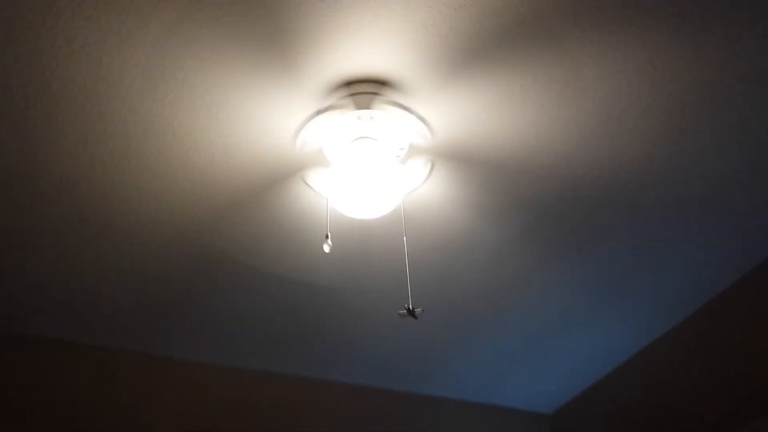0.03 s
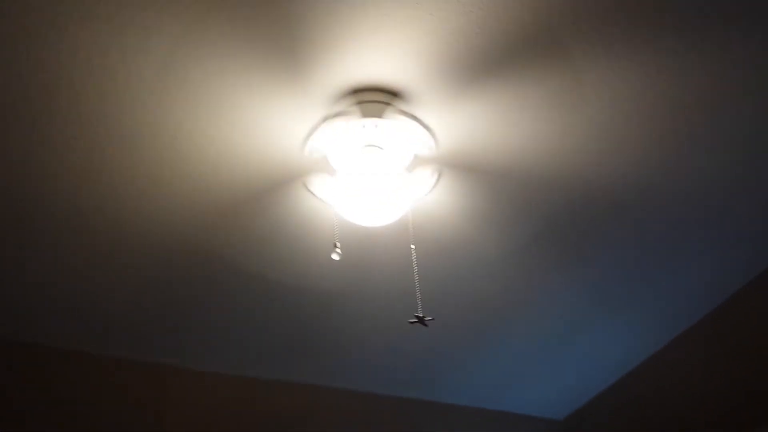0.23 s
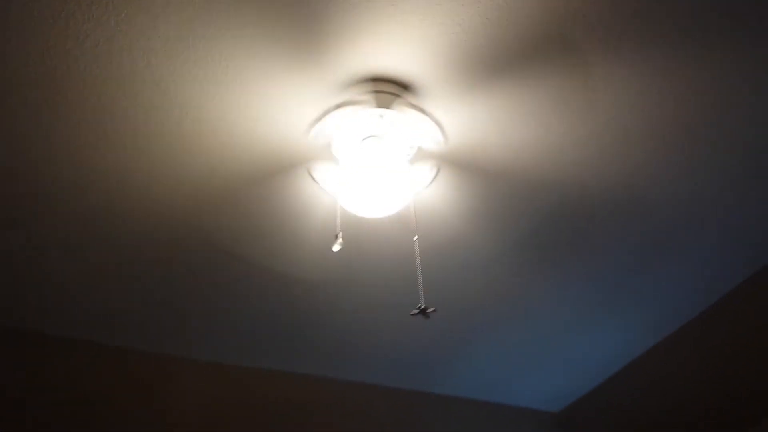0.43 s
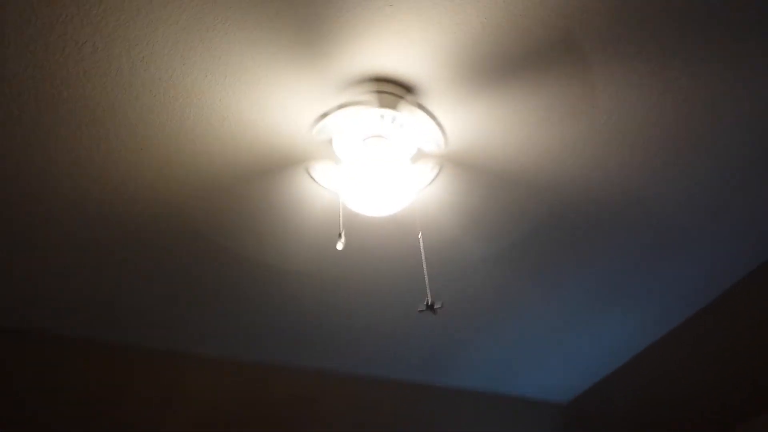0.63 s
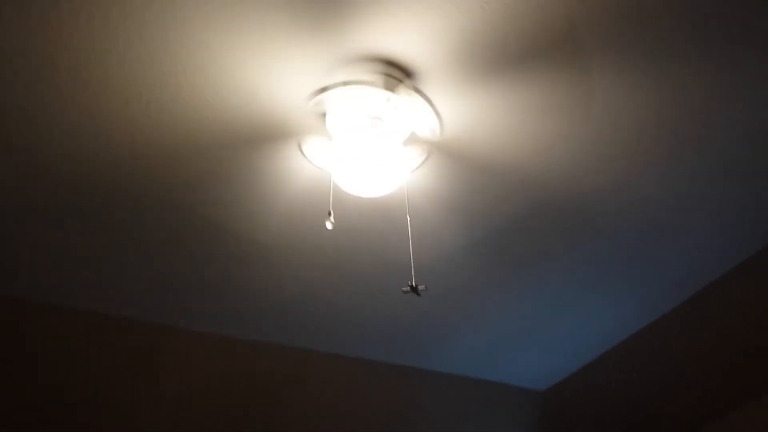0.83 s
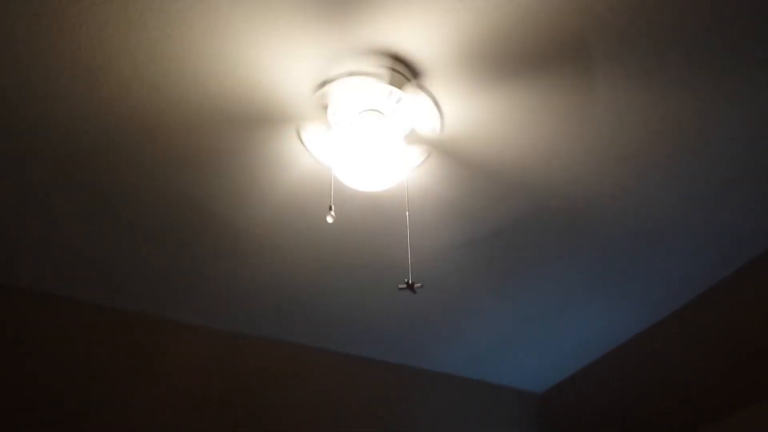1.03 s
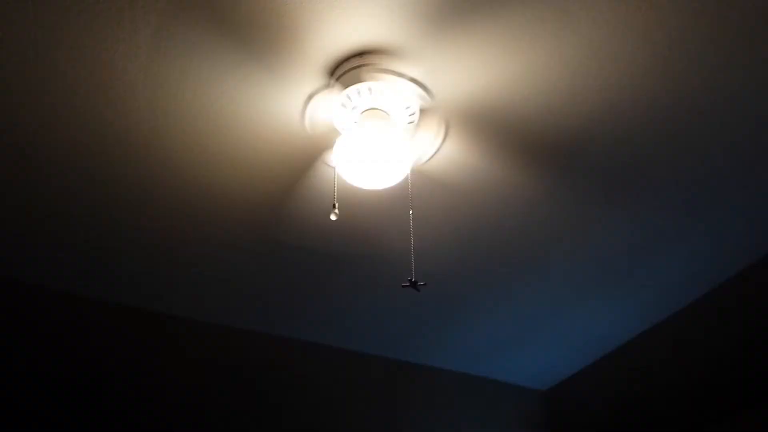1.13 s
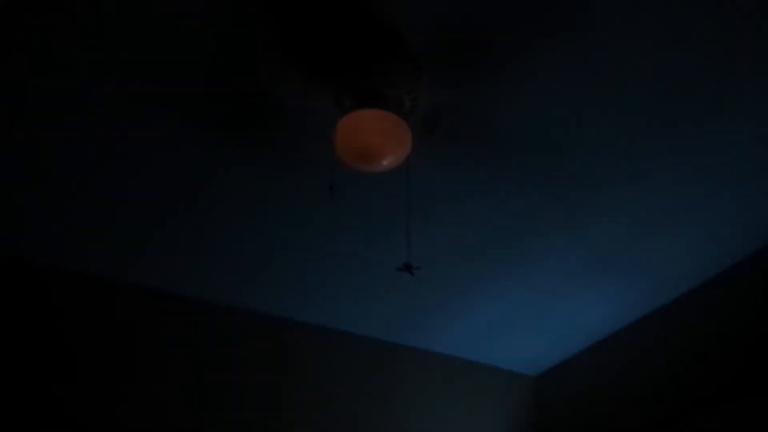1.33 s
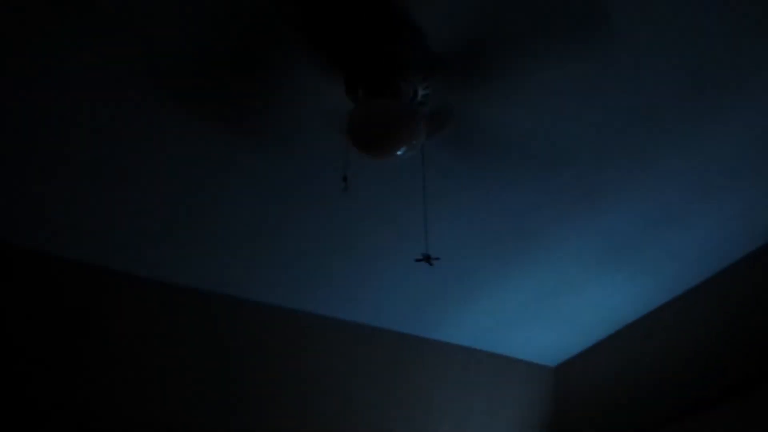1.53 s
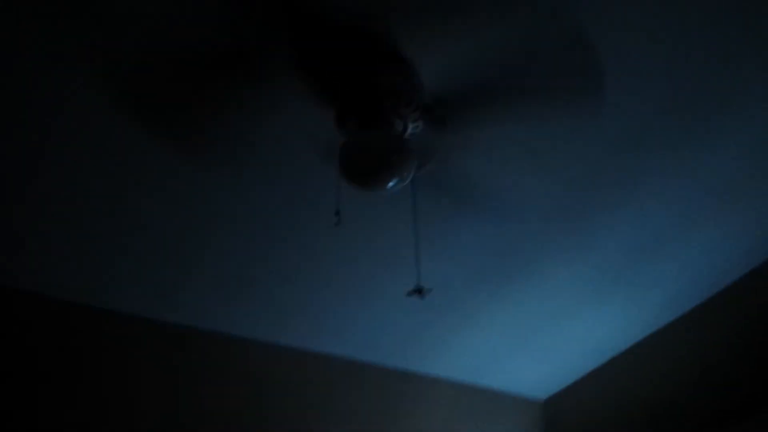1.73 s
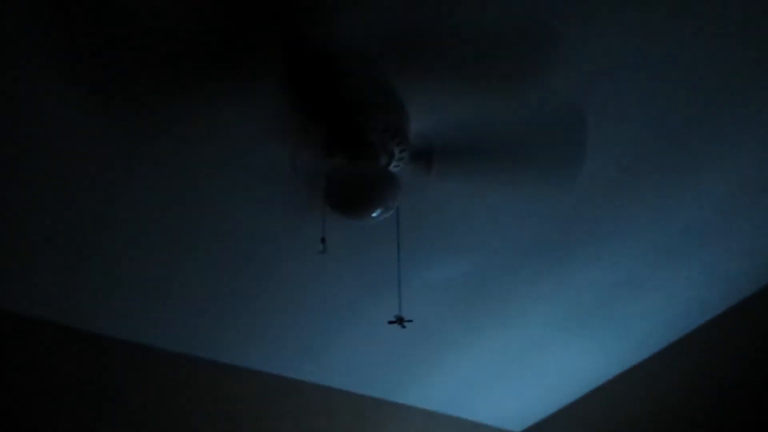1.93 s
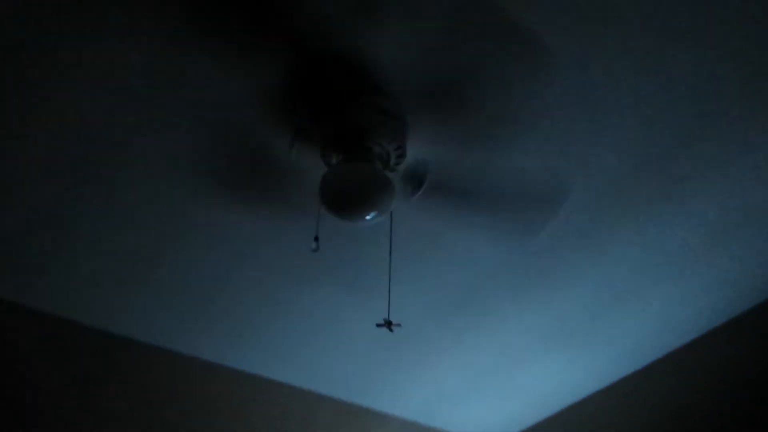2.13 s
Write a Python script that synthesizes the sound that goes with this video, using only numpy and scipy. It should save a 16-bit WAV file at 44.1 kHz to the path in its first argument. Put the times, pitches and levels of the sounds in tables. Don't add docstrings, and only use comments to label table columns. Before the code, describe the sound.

A wall light switch snaps off with a sharp plastic clack, then a smaller click follows in a quiet bedroom.

```python
import sys
import numpy as np
from scipy import signal
from scipy.fft import rfft, irfft
from scipy.io import wavfile
from scipy.ndimage import uniform_filter1d

SR = 44100
rng = np.random.default_rng(int(sys.argv[2]) if len(sys.argv) > 2 else 0)


def pcm_store(signal):
    levels = np.round(np.clip(np.atleast_2d(signal), -1, 1) * 32767)
    wavfile.write(sys.argv[1], SR, levels.astype(np.int16).T)


def gain_from_db(level_db):
    decades = np.asarray(level_db, float) / 20
    return 10 ** decades


N = 96799
T = np.arange(N) / SR
HZ = np.arange(N // 2 + 1) * SR / N + 1e-3
ROOM_LOW_HZ = 137.1
STRIKE_RISE_S = 0.00038
GROW = 1 - np.exp(-T[:int(0.3 * SR)] / STRIKE_RISE_S)
RING_IN_ROOM_DB = -13


def curve(table, hz):
    a = np.array(table, float)
    return np.interp(np.log(hz), np.log(a[:, 0]), a[:, 1])


def unit(x):
    return x / np.sqrt(np.mean(x ** 2))


def walk(rate_hz):
    k = int(SR / rate_hz)
    return unit(uniform_filter1d(uniform_filter1d(rng.standard_normal(N), k), k))


def left_right(mid, side, hz):
    # hz, share_0_to_1
    alike = [(50, 0.7), (110, 0.8), (300, 0.9), (600, 0.85), (1200, 0.2), (8000, 0)]
    c = np.clip(curve(alike, hz), 0, 1)
    mid, side = mid * np.sqrt(1 + c), side * np.sqrt(1 - c)
    return np.array([mid + side, mid - side])


def noise(gain):
    mid, side = rfft(rng.standard_normal((2, N))) * gain
    return unit(irfft(left_right(mid, side, HZ), N))


def grains(table):
    start_s, level_db, pitch_hz, cycles = np.array(table, float).T[:, :, None]
    turn = (T - start_s) * pitch_hz
    return -np.cos(2 * np.pi * turn) * np.exp(-(turn / cycles) ** 2) * gain_from_db(level_db)


def ring(modes):
    hz, db, t60_s = np.array(modes, float).T[:, :, None]
    db_chance, hz_chance, phase = rng.standard_normal((3, len(modes), 1))
    t = T[:len(GROW)]
    swing = np.sin(2 * np.pi * (hz * (1 + 0.006 * hz_chance) * t + phase))
    y = gain_from_db(db + 1.5 * db_chance) * swing * gain_from_db(-60 * t / t60_s)
    return y.sum(0) / np.sqrt(np.sum(gain_from_db(db) ** 2)) * GROW


def crack(colour):
    bright_hz, t60_s = 2270, 0.013
    n = len(GROW)
    f = np.fft.rfftfreq(n, 1 / SR) + 1
    gain = gain_from_db(curve(colour, f)) / (1 + (ROOM_LOW_HZ / f) ** 4)
    bright = gain / (1 + (bright_hz / f) ** 2)
    snap = unit(irfft(rfft(rng.standard_normal(n)) * bright, n))
    pulse = np.roll(irfft(gain, n), 88)
    pulse[-n // 2:] = 0
    return snap * gain_from_db(-60 * T[:n] / t60_s) * GROW, pulse / np.sqrt(np.sum(pulse ** 2))


def add(out, y, wet, start_s, db, pan_db, lag_s):
    left, right = int(start_s * SR), int((start_s + lag_s) * SR)
    out[0, left:left + len(y)] += wet * gain_from_db(db)
    out[1, left:left + len(y)] += y * gain_from_db(db + pan_db / 2)
    out[2, right:right + len(y)] += y * gain_from_db(db - pan_db / 2)


def strike(out, modes, colour, crack_db, start_s, db, pan_db):
    pulse_db = 15.5
    snap, pulse = crack(colour)
    body = ring(modes)
    wet = gain_from_db(RING_IN_ROOM_DB) * body + gain_from_db(pulse_db) * pulse
    add(out, body + gain_from_db(crack_db) * snap, wet, start_s, db, pan_db, lag_s=0.0004)


def low_cut(out):
    sos = signal.butter(2, ROOM_LOW_HZ, "high", fs=SR, output="sos")
    return np.vstack([out[:1], signal.sosfilt(sos, out[1:])])


def peak(hz, width_hz):
    return 1 / (1 + (2 * (HZ - hz) / width_hz) ** 2)


def still():
    # hz, db_per_hz
    tone = [(18, -53), (30, -3.5), (124, -15), (174, -13), (319, -9), (345, -13.5), (702, -16), (1460, -29),
            (16000, -34.5)]
    tone_db, fridge_db, hiss_db = -64.5, -72, -77
    y = noise(gain_from_db(curve(tone, HZ)) / (1 + (25 / HZ) ** 4)) * gain_from_db(tone_db)
    y += noise(peak(hz=124, width_hz=13)) * gain_from_db(fridge_db)
    return y + noise(peak(hz=6420, width_hz=2300)) * gain_from_db(hiss_db)


def fan():
    # hz, rms_db
    hum_lines = [(240.1, -66.5), (120.2, -87.5)]
    # hz, db_per_hz
    air_colour = [(40, -20.5), (90, -18), (170, -18.5), (300, -2), (600, 1.5), (900, -6), (1500, -12),
                  (3000, -21)]
    off_s, hum_fade_s, hum_wobble_db = 1.232, 0.05, 0.6
    air_db, coast_db_per_s, flutter_db, flutter_hz = -64.5, -5.5, 0.5, 23
    after_s = np.clip(T - off_s, 0, None)
    hum = np.zeros(N)
    for hz, db in hum_lines:
        level = np.sqrt(2) * gain_from_db(db + hum_wobble_db * walk(11.7))
        hum += level * np.sin(2 * np.pi * hz * T)
    air = noise(gain_from_db(curve(air_colour, HZ)) / (1 + (HZ / 5000) ** 2) / (1 + (35 / HZ) ** 4))
    air_level_db = air_db + coast_db_per_s * after_s + flutter_db * walk(flutter_hz)
    return hum * np.exp(-after_s / hum_fade_s) + air * gain_from_db(air_level_db)


def grip():
    # start_s, level_db, pitch_hz, pan_left_minus_right_db
    bumps = [(.008, -35.5, 51.3, 36), (0.027, -42.5, 66, 33), (0.045, -40, 108, 27.5), (0.067, -53, 80, 24),
             (0.108, -40, 73.4, 10), (0.13, -46.5, 63, 10), (0.21, -48.5, 59, 30), (0.308, -46, 62.5, -31),
             (.361, -49.5, 84.5, -27), (0.393, -51.5, 69, -12), (.665, -50, 42, 9)]
    y = grains([(s, db, hz, 0.53) for s, db, hz, _ in bumps])
    pan_db = np.array(bumps)[:, -1:]
    left = (y * gain_from_db(np.minimum(pan_db, 0))).sum(0)
    right = (y * gain_from_db(-np.maximum(pan_db, 0))).sum(0)
    return np.array([left, right])


def casing_ticks():
    # start_s, level_db, pitch_hz, cycles
    ticks = [(.268, -62, 7000, 4.3), (.2715, -57, 8500, 2.2), (.2745, -57.5, 5500, 1.8),
             (.3705, -53.5, 6400, 1), (.383, -48, 2100, 1.04), (.3875, -51.5, 1190, 1.6),
             (.3928, -49, 7000, 0.78), (.406, -60, 1400, 4.2), (.412, -61, 2840, 1.8),
             (.416, -60, 1420, 3.5), (.434, -63, 1480, 1.7), (1.7445, -57.5, 1673, 11),
             (0.958, -71, 900, 2), (1.557, -58, 6500, 1.2), (1.578, -66, 6200, 1.5)]
    to_room_db = -6
    return grains(ticks).sum(0) * gain_from_db(np.array([[to_room_db], [0], [0]]))


def toggle_release():
    # start_s, level_db, pan_left_minus_right_db
    contacts = [
        (1.6934, -36.5, 7.5),
        (1.6999, -46, -22),
        (1.7056, -53.5, 17),
    ]
    # hz, level_db, t60_s
    toggle = [(463, -9, 0.027), (656, -8, 0.085), (1030, -38, .05), (1691, -1.5, 0.058), (3037, -10, 0.085),
              (3470, 1.5, 0.018), (4250, -13, .012), (7080, 1, 0.013)]
    # hz, db_per_hz
    colour = [(450, 4.5), (1000, 6.5), (2500, 1), (4500, -2.5), (7000, -3), (9500, -11.5), (11000, -28),
              (15000, -28)]
    out = np.zeros((3, N))
    for start_s, db, pan_db in contacts:
        strike(out, toggle, colour, -4, start_s, db, pan_db)
    return low_cut(out)


def switch_off():
    # start_s, level_db, pan_left_minus_right_db, wall_thud_db
    contacts = [
        (1.2157, -40.5, 4, -30),
        (1.2322, -16.5, 3.5, -8.5),
        (1.2406, -22.5, 10.5, -3),
        (1.2477, -28.5, -7, -7.5),
    ]
    # hz, level_db, t60_s
    plate = [(2830, -3.5, 0.0086), (3380, 2, 0.024), (4540, -11, 0.011), (5610, 3, 0.02), (6540, 0, 0.02),
             (8260, -3, 0.0083)]
    # hz, level_db, t60_s
    wall = [(186, -5, 0.099), (305.4, -2, .16), (515, -3.5, 0.14), (660, -1, 0.097), (714, -6.5, .07),
            (851, 5.5, 0.045), (976, 0.5, 0.22), (1094, 2, 0.044), (1264, 1.5, 0.12)]
    # hz, db_per_hz
    colour = [(200, -3), (420, -8), (1000, 0.5), (1800, -7), (3200, -7), (6200, -6.5), (9500, -19),
              (15000, -36)]
    wall_rise_s, wall_lag_s = 0.0015, 0.00026
    out = np.zeros((3, N))
    for start_s, db, pan_db, thud_db in contacts:
        strike(out, plate, colour, -1.5, start_s, db, pan_db)
        boom = ring(wall) * (1 - np.exp(-T[:len(GROW)] / wall_rise_s))
        add(out, boom, gain_from_db(RING_IN_ROOM_DB) * boom, start_s, db + thud_db, pan_db / 2, wall_lag_s)
    return low_cut(out)


def room(x):
    # hz, t60_s
    decay = [(125, 0.61), (300, 0.44), (1000, 0.31), (3000, 0.3), (7000, 0.3), (14000, 0.36)]
    level_db, gap_s, rise_s = -0.5, 0.00094, 0.0012
    t = T[:SR // 2]
    f = np.fft.rfftfreq(len(t), 1 / SR) + 1
    mid, side = rfft(rng.standard_normal((2, len(t)))) / (1 + (ROOM_LOW_HZ / f) ** 4)
    white = left_right(mid, side, f)
    tail = 0
    for hz in 62.5 * 2.0 ** np.arange(9):
        share = np.clip(1 - np.abs(np.log2(f / hz)), 0, 1)
        tail = tail + irfft(white * share, len(t)) * gain_from_db(-60 * t / curve(decay, hz))
    tail = tail * (1 - np.exp(-np.clip(t - gap_s, 0, None) / rise_s))
    tail = tail / np.sqrt(np.sum(tail ** 2) / 2)
    return signal.fftconvolve(x[None], tail, axes=1)[:, :N] * gain_from_db(level_db)


def scene():
    # time_s, gain_db
    gain = [(0, 6), (.3, 4.5), (.7, 2.5), (1.2, 4.5), (1.5, 1.5), (1.85, 0.5), (2.19, -2)]
    steady = (still() + fan()) * gain_from_db(np.interp(T, *np.array(gain).T) - 4)
    clicks = casing_ticks() + toggle_release() + switch_off()
    return clicks[1:] + room(clicks[0]) + steady + grip()


def top_cut(x):
    return signal.sosfilt(signal.butter(12, 16590, fs=SR, output="sos"), x)


def record(dry):
    mic_low_hz, top_hz = 38, 15650
    x = signal.sosfilt(signal.butter(2, mic_low_hz, "high", fs=SR, output="sos"), dry)
    x = signal.sosfilt(signal.ellip(10, 0.2, 60, top_hz, fs=SR, output="sos"), x)
    return top_cut(x)


dry = scene()
out = record(dry)
pcm_store(out)
```